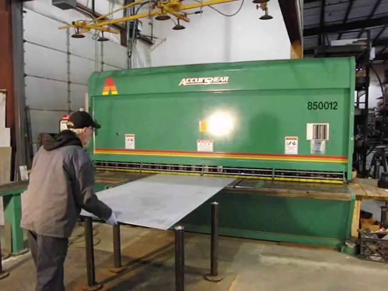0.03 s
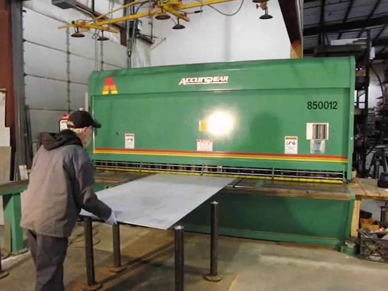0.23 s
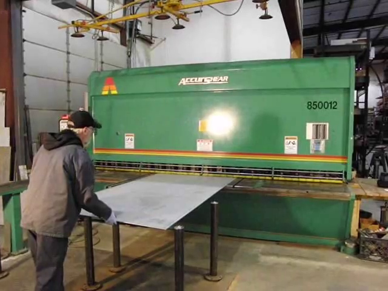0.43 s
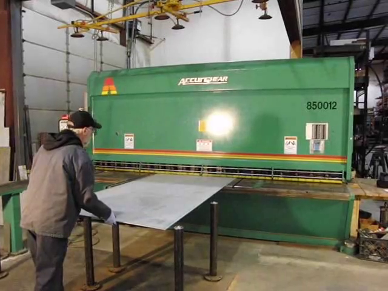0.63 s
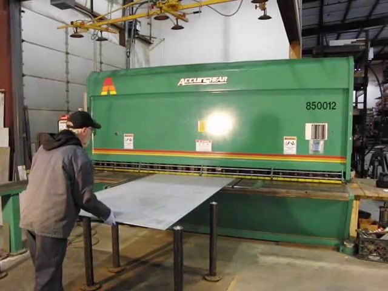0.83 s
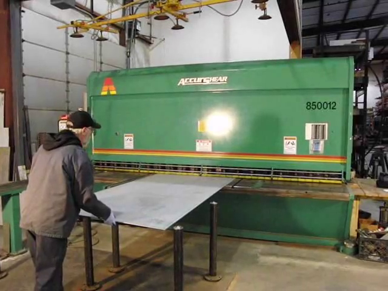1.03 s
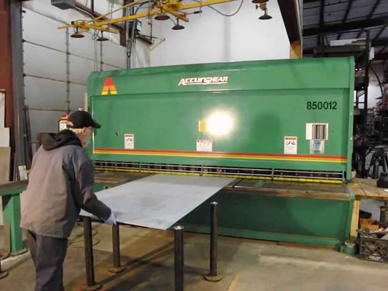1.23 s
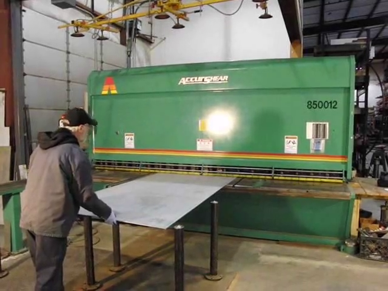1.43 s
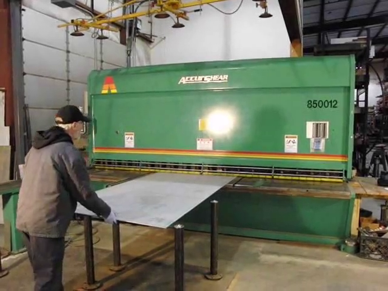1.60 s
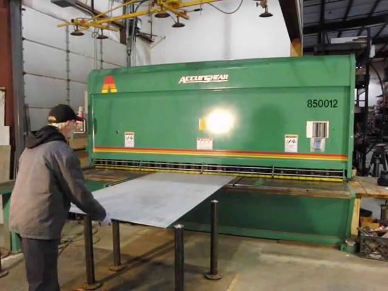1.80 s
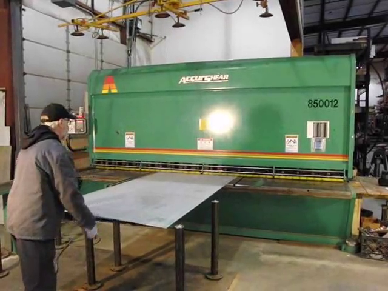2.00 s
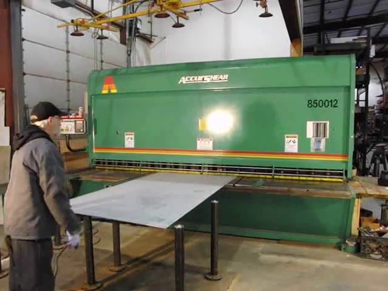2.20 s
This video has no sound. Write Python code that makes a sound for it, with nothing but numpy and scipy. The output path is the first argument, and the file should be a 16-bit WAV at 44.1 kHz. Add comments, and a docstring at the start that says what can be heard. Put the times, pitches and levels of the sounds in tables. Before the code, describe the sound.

A hydraulic shear whines, cuts sheet metal with a clack, and the strip clatters down.

```python
"""A pump whines and hisses in a workshop: the piston ripple of a hydraulic plate shear. A valve opens
and oil rushes through ringing lines as the blade beam comes down, shaking the frame. The blade snaps
through with a clack and a thump. The cut strip crashes down and rattles to rest, each impact exciting
its bending modes, and a small piece of steel clinks near by. The blows echo in the hall."""
import sys
import numpy as np
from scipy import signal
from scipy.fft import rfft, irfft
from scipy.io import wavfile

SR = 44100
rng = np.random.default_rng(int(sys.argv[2]) if len(sys.argv) > 2 else 0)


def unload_audio(sound):
    """Save the sound as a 16-bit wav file, at the path given as the first command line argument."""
    columns = np.transpose(np.atleast_2d(sound))
    # keep every value between -1 and 1, then stretch to whole-number steps
    steps = np.round(np.clip(columns, -1, 1) * 32767)
    wavfile.write(sys.argv[1], SR, steps.astype(np.int16))


N = 103635
T = np.arange(N) / SR

# Course of the stroke. Each row: time in seconds, then idle hiss, oil rush and frame rumble in dB.
STROKE_LEVELS = [(0, -33, -58, -39), (.22, -33.5, -54, -42), (.3, -32.5, -33.5, -34),
                 (.36, -32.5, -38.5, -34.5), (.42, -39, -28.5, -35), (.66, -53, -28.5, -28.5),
                 (.78, -37, -31.5, -29.5), (.92, -41, -28.5, -36), (1.08, -30, -29.5, -36),
                 (1.17, -27.5, -34, -51), (1.29, -31.5, -43, -60), (1.5, -60, -39, -53),
                 (1.8, -64, -36, -45.5), (2.03, -73, -45, -61), (2.18, -42.5, -42, -57),
                 (2.35, -50, -53.5, -53)]
# Spectra of a midrange clatter and a bright spray. Each row: frequency in Hz, relative level in dB.
CLATTER_SPECTRUM = [(60, -30), (150, -14), (240, -9.5), (400, -13.5), (600, -2.5), (950, -6.5), (1200, 0.5),
                    (1550, -1), (2300, 0.5), (3100, -2), (3700, -5.5), (5000, -10), (7000, -23.5),
                    (15000, -28.5)]
SPRAY_SPECTRUM = [(500, -29), (3000, -3), (5000, 2), (9000, -3), (15000, -4.5)]


def amp(db):
    """Decibels to amplitude ratio."""
    return 10 ** (np.asarray(db) / 20)


def unit(x):
    """Normalisation to rms 1."""
    return x / np.sqrt(np.mean(x ** 2) + 1e-20)


def read(points, hz):
    """Interpolation on a log-frequency axis."""
    f, value = np.transpose(points)
    return np.interp(np.log(hz + 1), np.log(f), value)


def curve(rows, column=1):
    """Linear interpolation of one column in time."""
    rows = np.array(rows)
    return np.interp(T, rows[:, 0], rows[:, column])


def shaped(x, spectrum):
    """Filtering by a given spectrum, at rms 1."""
    return unit(irfft(rfft(x) * amp(read(spectrum, np.fft.rfftfreq(N, 1 / SR))), N))


def noise(spectrum):
    """Steady noise: white noise, filtered."""
    return shaped(rng.standard_normal(N), spectrum)


def band(hz, width_hz):
    """Narrowband noise: a resonance under random excitation."""
    f = np.fft.rfftfreq(N, 1 / SR)
    return unit(irfft(rfft(rng.standard_normal(N)) / (1 + (2 * (f - hz) / width_hz) ** 2), N))


def tone(hz, waver_hz, flutter):
    """A sinusoid under random frequency and amplitude modulation."""
    cycles = np.cumsum(hz + waver_hz * band(0.71, 38.7)) / SR
    return unit((1 + flutter * band(1, 34)) * sine(cycles))


def sine(cycles):
    """Harmonic oscillation with a random starting phase."""
    return np.sin(2 * np.pi * (cycles + rng.random()))


def strike(start, t60, rise=0.00066):
    """Impact envelope: linear rise, exponential damping."""
    t = np.maximum(T - start, 0)
    return np.minimum(t / rise, 1) * amp(-60 * t / t60)


def convolve(x, response):
    """Output of a linear system with a given impulse response."""
    return signal.fftconvolve(x, response)[:N]


def blade_clacks():
    """Impact excitation: a broadband burst, quickly damped blade modes and a long ring of the beam."""
    # Blade and clamp. Each row: start in seconds, level in dB, burst t60 in seconds, relative tail in dB.
    impacts = [(0.514, -29, 0.23, -8), (1.0971, -9, 0.038, -8.5)]
    # Each row of both: frequency in Hz, relative level in dB.
    burst_spectrum = [(100, 1.5), (400, -13.5), (800, -8), (1350, -7), (1700, -9), (2800, -2), (3500, -10),
                      (4700, -9), (8000, -13.5), (12000, -8), (15500, -8)]
    blade_modes = [(1350, -3.5), (2450, -13), (2780, -9), (3320, -3.5), (9550, -6.5)]
    beam_hz = 325
    out = np.zeros(N)
    for start, db, t60, tail_db in impacts:
        ring = sum(amp(mode_db) * sine(hz * T) for hz, mode_db in blade_modes) * strike(start, t60=0.032)
        burst = noise(burst_spectrum) * (strike(start, t60) + amp(tail_db) * strike(start, t60=0.52))
        spray = amp(-33) * noise(SPRAY_SPECTRUM) * strike(start, t60=0.26)
        beam = amp(-29.5) * np.sin(2 * np.pi * beam_hz * (T - start)) * strike(start, t60=2.2)
        out += amp(db) * (burst + ring + spray + beam)
    return out


def frame_thumps(drone):
    """Damped vibration: the heavy frame answers each blow with low noise and its lowest resonance."""
    # Each row: start in seconds, level in dB, t60 in seconds.
    thumps = [(.371, -26.5, .3), (.422, -27.5, .25), (.517, -23.5, .25), (.59, -29, .3), (1.1, -21.5, .4),
              (1.308, -35, .25), (1.8, -44, .3), (2.105, -39, .4)]
    # Each row: frequency in Hz, relative level in dB.
    spectrum = [(20, -52), (50, -17), (68, -6), (95, -11), (130, 1.5), (175, -4), (240, -3), (350, -46),
                (700, -30), (3000, -90)]
    return sum(amp(db) * unit(noise(spectrum) + amp(-4) * drone) * strike(start, t60, rise=0.0085)
               for start, db, t60 in thumps)


def falling_strip():
    """Plate vibration: the strip lands with a hollow bonk; blows and rattling ring its dense modes."""
    # Each row: start in seconds, relative force in dB.
    blows = [(1.302, 6.5), (1.310, 1.5), (1.347, 9), (1.357, -0.5), (1.378, 6), (1.386, -1), (1.404, 2),
             (1.412, 3.5), (1.429, 1), (1.552, -3), (1.619, 1), (1.65, -4), (1.801, -4), (1.81, -6),
             (2.196, -16), (2.209, -23), (2.221, -23), (2.286, -19.5)]
    # Each row: time in seconds, relative rattling force in dB, treble scrape in dB.
    rattle_levels = [(1.3, -48, -66), (1.345, -19, -26), (1.42, -18, -27), (1.46, -16, -39),
                     (1.53, -12.5, -46), (1.64, -10, -31), (1.72, -17.5, -37.5), (1.84, -17, -37),
                     (1.95, -23, -50), (2.05, -29, -64), (2.35, -83, -58)]
    # Each row: frequency in Hz, relative level in dB.
    strong_modes = [(467, -5), (1161, -1), (1213, 0), (1400, -1), (1778, -1), (1843, -2), (2130, 3),
                    (2450, 2), (2608, -2)]
    # Each row: frequency in Hz, relative level in dB, t60 in seconds.
    low_modes = [(118, -11, .25), (222, 3.5, .14), (285, -5, .22), (468, -4.5, .3), (548, 3, .13),
                 (880, -7, .35)]
    # Each row: time in seconds, level in dB.
    wobble_levels = [(1.45, -73), (1.53, -34), (1.7, -39.5), (1.85, -34), (1.98, -41.5), (2.1, -41.5),
                     (2.35, -56.5)]
    landing_s, blow_decay_s, contacts_per_s, patches = 1.311, .003, 500, 2
    landed = T > landing_s
    impulses = unit(rng.standard_normal(N) * (rng.random(N) < contacts_per_s / SR))
    force = impulses * amp(curve(rattle_levels)) * landed
    for start, db in blows:
        decay = (T > start) * np.exp(-np.maximum(T - start, 0) / blow_decay_s)
        force += amp(db) * rng.standard_normal(N) * decay
    # Each patch of the plate has its own impulse response.
    patch = rng.integers(0, patches, N)
    dense = unit(sum(convolve(force * (patch == k), noise(CLATTER_SPECTRUM) * strike(0, t60=0.44))
                     for k in range(patches)))
    contact = shaped(force, CLATTER_SPECTRUM)
    # Modal amplitude is the square root of the stored energy.
    swing = unit(np.sqrt(abs(convolve(force ** 2, strike(0, t60=0.41) ** 2))))
    ring = swing * sum(amp(db) * tone(hz, waver_hz=5.38, flutter=0.75) for hz, db in strong_modes)
    scrape = amp(curve(rattle_levels, column=2)) * noise(SPRAY_SPECTRUM)
    wobble = amp(curve(wobble_levels)) * band(hz=235.2, width_hz=55)
    bonk = sum(amp(db) * np.sin(2 * np.pi * hz * (T - landing_s)) * strike(landing_s, t60, rise=0.0015)
               for hz, db, t60 in low_modes)
    clatter = amp(-29) * dense + amp(-35.5) * contact + amp(-46) * ring
    return clatter + amp(-20) * bonk + (scrape + wobble) * landed


def steel_clinks():
    """Beating: a small piece of steel cracks down and bounces once, ringing in close pairs of modes."""
    # Each row: start in seconds, level in dB.
    impacts = [(2.055, -29.5), (2.16, -44)]
    # Each row of both: frequency in Hz, relative level in dB.
    modes = [(3117, -10), (3741, -11), (4600, -9), (5701, -7), (6966, -7), (8199, -9), (8565, -12),
             (9647, -10), (11290, -11), (11980, -5), (12630, -10), (13430, -13), (14310, -12)]
    crack_spectrum = [(1500, -12), (2600, -3), (8000, -5.5), (14000, -13)]
    detune_hz = 45
    out = np.zeros(N)
    for start, db in impacts:
        decay = strike(start, t60=.2)
        for hz, mode_db in modes:
            pair = unit(sum(gain * sine((hz + detune_hz * rng.uniform(-1, 1)) * T) for gain in (1, .5)))
            out += amp(db + mode_db) * pair * decay
        out += amp(db + 8) * noise(crack_spectrum) * (strike(start, t60=.03) + amp(-13) * decay)
    return out


def pump():
    """Periodic piston ripple gives a harmonic series, modulated in phase and level by each shaft turn."""
    # The pitch sags under load. Each row: time in seconds, ripple frequency in Hz.
    ripple_pitch = [(0, 359), (.3, 360.8), (.5, 356.5), (1.1, 355.3), (1.4, 360), (2.35, 355.7)]
    # Each row: time in seconds, idling whine in dB, loaded whine in dB.
    whine_levels = [(0, -39, -44.5), (.28, -35, -47.5), (.42, -47, -36), (.8, -51, -33), (1.1, -49, -32.5),
                    (1.16, -61, -40.5), (2.0, -64, -54), (2.35, -55, -58)]
    # Each row of both: harmonic number, relative level in dB.
    idle_harmonics = [(10, -8), (13, 1), (14, -2.5), (15, -4.5), (16, -11), (17, -11), (24, -12), (25, -11)]
    load_harmonics = [(1, 0), (2, -1.5), (3, 0), (4, -10), (10, -8), (12, -5), (14, -4.5), (16, -10),
                      (18, -5), (19, -6.5), (20, -11), (21, -13), (23, -3), (24, -12), (25, -11)]
    jitter, ripples_per_turn, swing_cycles = .00018, 12, .0025
    cycles = np.cumsum(curve(ripple_pitch) * (1 + jitter * band(0.79, 21))) / SR
    shaft_angle = 2 * np.pi * cycles / ripples_per_turn
    cycles += swing_cycles * np.sin(shaft_angle)
    def harmonic(k):
        throb = 1 + min(k * .014, .5) * np.cos(shaft_angle + rng.random())
        flutter = 1 + .24 * (band(1, 6.9) + 1j * band(1, 6.7))
        return throb * (flutter * np.exp(2j * np.pi * (k * cycles + rng.random()))).real
    def whine(harmonics):
        return unit(sum(amp(db) * harmonic(k) for k, db in harmonics))
    buzz = amp(-13) * whine([(k, 4 * rng.standard_normal()) for k in range(26, 43)])
    idling = amp(curve(whine_levels)) * (whine(idle_harmonics) + buzz)
    loaded = amp(curve(whine_levels, column=2)) * (whine(load_harmonics) + buzz)
    return idling + loaded


def oil_flow():
    """Turbulence: an idle hiss, the spurt of the valve, and oil rushing through resonant lines."""
    # Each row of all three: frequency in Hz, relative level in dB.
    hiss_spectrum = [(25, 5), (60, -22), (300, 4), (550, -0.5), (900, -4.5), (1550, 2), (2400, -6),
                     (3500, 1.5), (4700, 4), (6500, -5), (15000, -6.5)]
    rush_spectrum = [(100, -17), (260, -0.5), (500, 1), (1000, 0), (1550, -1.5), (2100, 2.5), (2750, 3),
                     (3500, -2.5), (5000, -6), (8000, -11.5), (15000, -14)]
    pipe_modes = [(583, 0), (2105, -5), (2562, -6)]
    # Each row: time in seconds, level in dB.
    pipe_levels = [(0, -54), (.22, -54), (.28, -45), (.77, -37.5), (1.06, -32.5), (1.3, -43.5),
                   (1.85, -41.5), (2.1, -51), (2.35, -54.5)]
    hiss = amp(curve(STROKE_LEVELS)) * noise(hiss_spectrum)
    rush = amp(curve(STROKE_LEVELS, column=2)) * noise(rush_spectrum)
    valve = amp(-28) * strike(start=.236, t60=0.43, rise=0.0019) * noise(CLATTER_SPECTRUM)
    pipes = unit(sum(amp(db) * tone(hz, waver_hz=2.5, flutter=.28) for hz, db in pipe_modes))
    return hiss + rush + valve + amp(curve(pipe_levels)) * pipes


def frame_rumble(drone):
    """Forced vibration: the stroke shakes the frame, with a low surge as the beam sets off."""
    # Each row: frequency in Hz, relative level in dB.
    spectrum = [(20, -33), (75, -9.5), (110, -3.5), (140, -1.5), (170, -12.5), (240, -5.5), (320, -15.5),
                (600, -68)]
    rumble = amp(curve(STROKE_LEVELS, column=3)) * unit(noise(spectrum) + amp(1) * drone)
    surge = amp(-26) * band(hz=74, width_hz=31) * strike(start=0.24, t60=0.83, rise=0.15)
    return rumble + surge


def workshop(x):
    """Reverberation: a diffuse field builds up and decays, the highest treble first."""
    # Each row: frequency in Hz, t60 in seconds.
    decay_times = [(100, 0.62), (1000, 0.46), (4000, 0.85), (15000, 0.28)]
    build_up_s = 0.029
    hz, t, spectra = signal.stft(rng.standard_normal(SR), SR, nperseg=256)
    envelope = amp(-60 * t / read(decay_times, hz)[:, None]) * np.minimum(t / build_up_s, 1)
    tail = signal.istft(spectra * envelope, SR, nperseg=256)[1]
    return convolve(x, tail / np.linalg.norm(tail))


def scene():
    """Superposition of blows, running machine and echo; thumps and rumble share one frame resonance."""
    drone = tone(hz=139.6, waver_hz=10, flutter=.45)
    blows = blade_clacks() + frame_thumps(drone) + falling_strip() + steel_clinks()
    machine = pump() + oil_flow() + frame_rumble(drone)
    return (blows + machine + amp(-9) * workshop(blows))[None]


def record(dry):
    """Linear filtering: a fixed tone colour with narrow dips in the treble, then a band limit."""
    # Each row: frequency in Hz, gain in dB.
    colour_gain = [(20, -1.5), (3400, 0), (3950, -3.5), (4050, -29), (4120, -8.5), (4270, -2), (5100, -1.5),
                   (5600, -5.5), (6250, -18), (6800, -9.5), (7300, -8), (7900, -13.5), (8500, -6),
                   (9500, -6.5), (10200, -12.5), (11000, -3.5), (15000, -2.5)]
    cutoff_hz = 15500
    log_gain = np.log(amp(read(colour_gain, abs(np.fft.fftfreq(4096, 1 / SR)))))
    response = np.fft.ifft(np.exp(np.conj(signal.hilbert(log_gain)))).real[:2048]
    lowpass = signal.firwin(511, cutoff_hz, window=("kaiser", 9), fs=SR)
    return signal.fftconvolve(convolve(dry[0], response), lowpass, "same")[None]


dry = scene()
out = record(dry)
unload_audio(out)
```